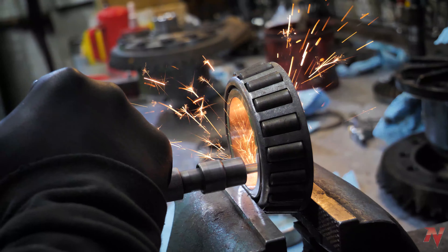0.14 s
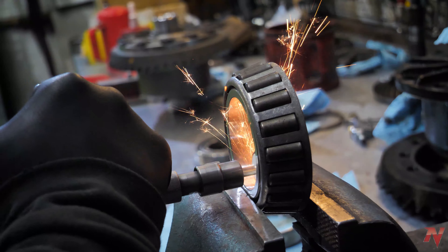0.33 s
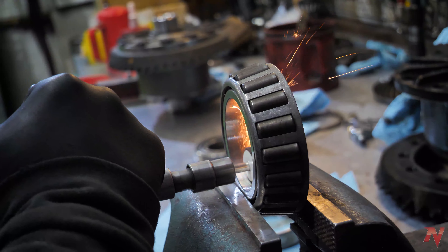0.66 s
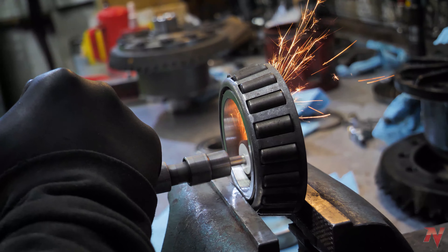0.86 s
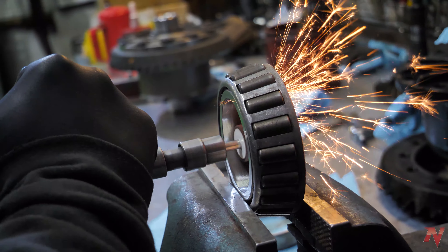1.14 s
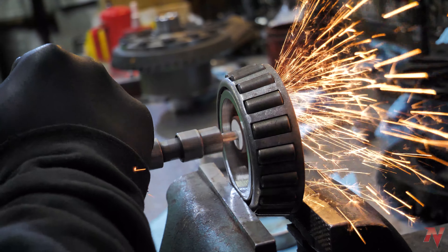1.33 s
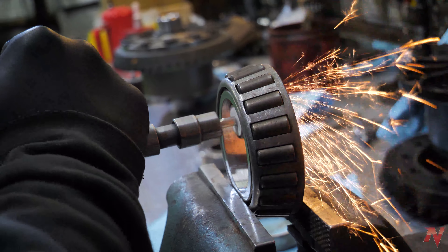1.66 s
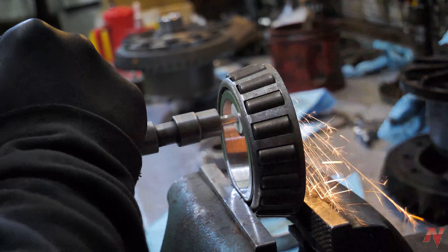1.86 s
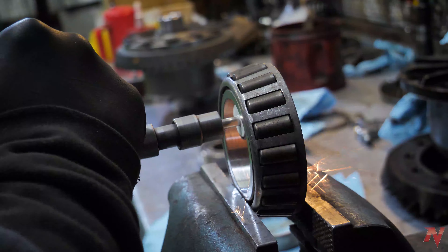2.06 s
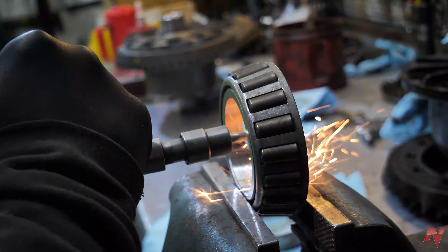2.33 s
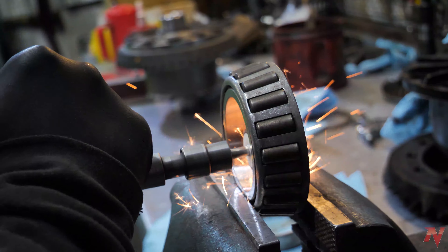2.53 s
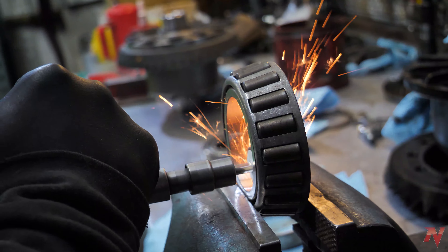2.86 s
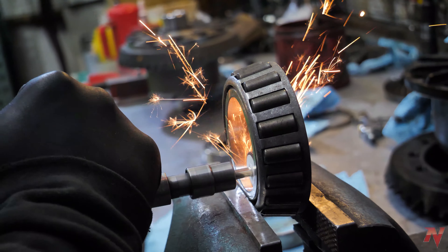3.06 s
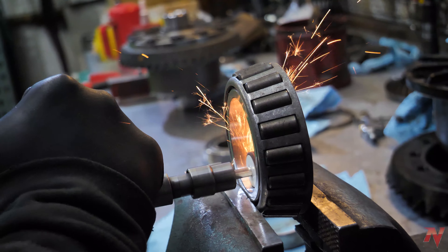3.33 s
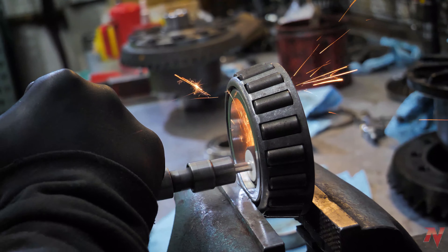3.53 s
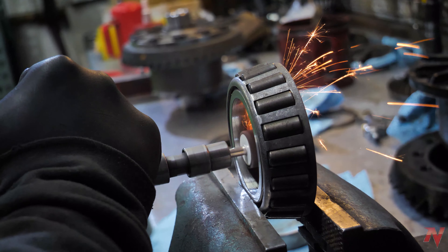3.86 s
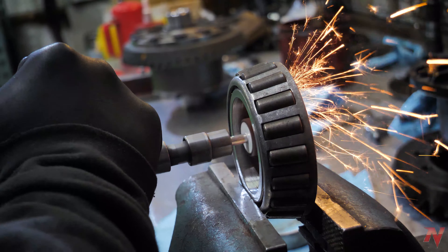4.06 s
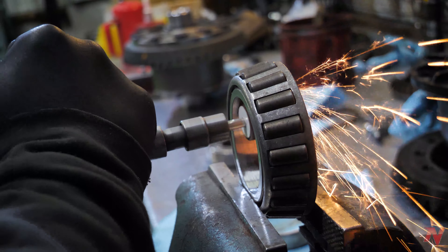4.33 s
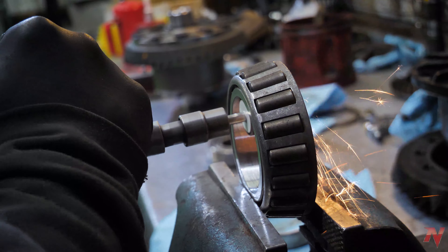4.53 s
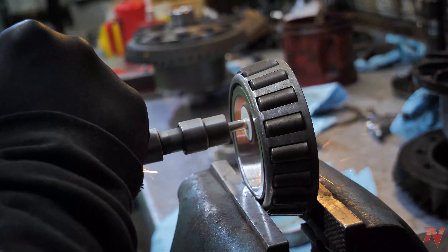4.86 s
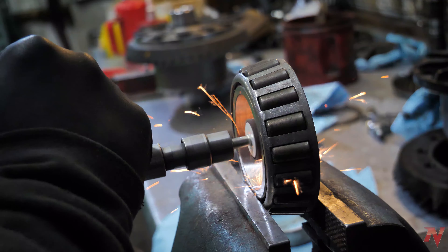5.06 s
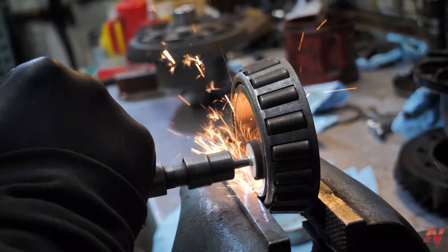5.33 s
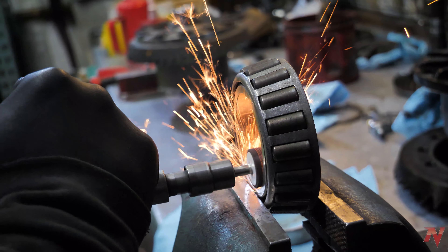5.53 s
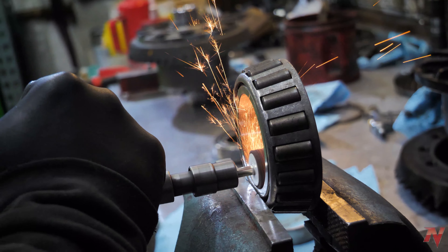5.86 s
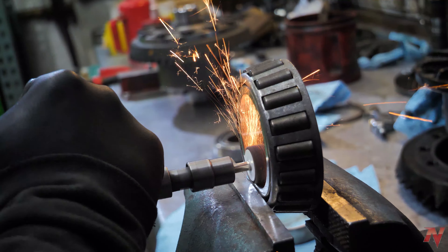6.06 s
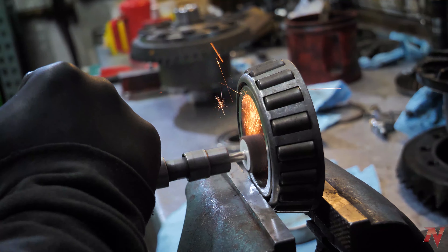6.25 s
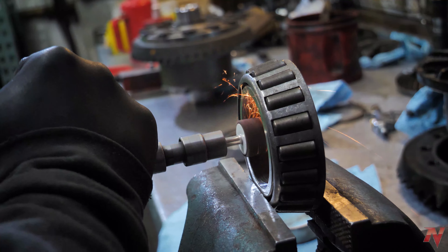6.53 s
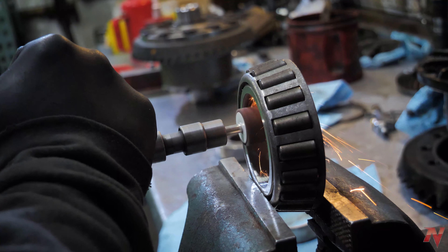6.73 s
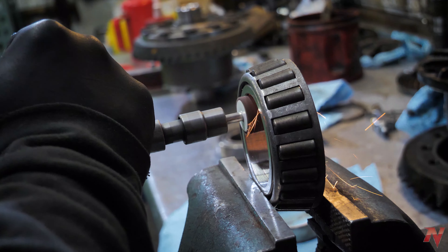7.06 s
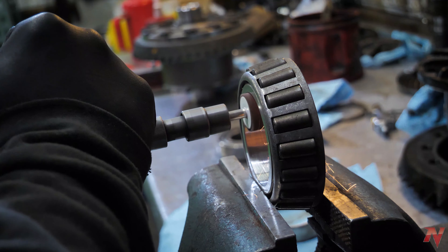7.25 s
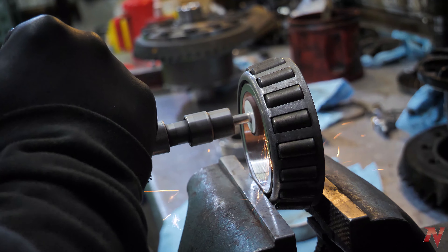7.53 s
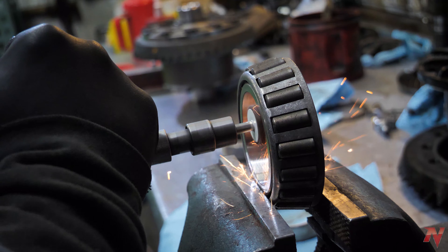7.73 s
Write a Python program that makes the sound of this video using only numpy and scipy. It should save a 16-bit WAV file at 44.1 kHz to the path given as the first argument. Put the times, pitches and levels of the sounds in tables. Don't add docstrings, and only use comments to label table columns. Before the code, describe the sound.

A close, dry, almost mono workshop sound: an air die grinder is already running at full noise and continues through about 8 seconds. A buzzing motor hum near 800-900 Hz carries a dense, shrill whine, with abrasive scraping, spark sizzle and airy exhaust hiss over low rumble and bench shake. From 0 to 0.6 s it bites hard, the pitch sagging deeply around 0.35 s. Near 0.9-1.2 s the scrape eases and bright steel ringing surges. Rougher grinding returns at 1.4-1.8 s, then lighter ringing near 2 s. Heavy, lower-pitched scraping fills 2.5-3.5 s, dipping most around 3 s. A piercing ring rises at 3.8 s, followed by uneven rasping and another ring around 4.6-4.9 s. From 5.2 to 6 s the load and hiss grow; at 6.4 s it brightens sharply, then alternates moderate scraping with ringing until the end, still running.

```python
import sys
import numpy as np
from scipy import signal
from scipy.fft import rfft, irfft, next_fast_len
from scipy.io import wavfile

SR = 44100
rng = np.random.default_rng(int(sys.argv[2]) if len(sys.argv) > 2 else 0)


def magnitude_from_level(level_db):
    exponent = np.asarray(level_db, float) / 20
    return 10 ** exponent


def inscribe(sig):
    pcm = np.round(np.clip(np.atleast_2d(sig).T, -1, 1) * 32767)
    wavfile.write(sys.argv[1], SR, pcm.astype(np.int16))


N = 348390
STEP = 64


def wheel(angle, speed, level, wander, wander_hz, spread):
    # f/Hz, width/Hz, level/dB
    ring_families = [
        [(5890, 505, -8), (6380, 500, -7.5)],
        [(7004, 910, -9), (7930, 860, -7)],
        [(8900, 1230, -9.5), (10110, 1460, -11)],
    ]
    # f/Hz, level/dB
    whine_skirt = [(200, -22), (1200, -17.5), (3000, -6), (9000, -34.5), (11000, 0), (15500, -2.5)]
    strong_orders = {6: 9.6, 15: 6.1, 26: 1.3, 27: 1.5, 28: 2.1, 32: 4.1, 36: 4.3, 38: 1.8, 40: 2.8, 43:
                     3.1, 44: 3.3, 46: 3.6, 48: 2.4, 52: 2.9, 56: 2.2, 60: 5.4, 64: 2.6}
    orders = np.arange(1, 76)
    hz = orders[:, None] * speed

    hump = 0
    for family_db, modes in zip(level["rings"], ring_families):
        for k, (f, width, db) in enumerate(modes):
            hump = hump + magnitude_from_level(family_db + db) * (-1) ** k / (1 + 2j * (hz - f) / width) ** 2
    thud = magnitude_from_level(level["low whine"] - 7.0) * np.exp(-.5 * ((hz - 4500) / 700) ** 2)
    edge = magnitude_from_level(level["whine top"] - 15.0 + at_hz(whine_skirt, hz))
    accent = magnitude_from_level([[strong_orders.get(k, 0)] for k in orders])

    knock = np.exp(1j * spread * rng.standard_normal((len(orders), 1)))
    wear = drift(wander_hz, count=len(orders)) + 1j * drift(wander_hz, count=len(orders))
    contacts = knock + wander * wear[:, :len(speed)]
    share = (hump + 1j * (thud + edge)) * accent * contacts * (hz < 15800)

    turn, spin, out = np.exp(1j * angle), np.ones(N, complex), np.zeros(N)
    for row in share:
        spin *= turn
        out += full(row.real) * spin.real - full(row.imag) * spin.imag
    return out


def motor(angle, speed, level, fourth_db, sides_db, flutter_db):
    # f/Hz, width/Hz, level/dB
    exhaust_pipe = [(812, 76, 8.5), (1590, 57, 11), (1865, 80, 3.5), (2365, 285, 9), (2583, 60, 4)]

    def through_pipe(part, order):
        return full(level[part] + resonance(exhaust_pipe, order * speed))

    shaft_db, puff_db = full(level["shaft"]), full(level["puff"])
    vane_db = through_pipe("vanes", 4) + full(level["push"])
    second_db = through_pipe("second", 8) + .6 * puff_db
    third_db = through_pipe("third", 12) + puff_db
    tones = {1: shaft_db, 2: shaft_db - 2.5, 3: vane_db + sides_db, 4: vane_db, 5: shaft_db,
             8: second_db, 12: third_db, 16: third_db + fourth_db}
    out = np.zeros(N)
    for (k, db), slow in zip(tones.items(), drift(10.3, count=len(tones))):
        unsteady_db = flutter_db * (1 + k / 9) * full(slow)
        out += np.sqrt(2) * magnitude_from_level(db + unsteady_db) * np.sin(k * angle + k)
    return out


def scraping(level, pulse, patchy_db):
    # f/Hz, level/dB per Hz
    scrape_spectrum = [(900, -32.5), (1400, -17.5), (2000, -8), (2400, -6), (3300, 0.5), (4000, -6),
                       (4700, -7.5), (6000, -11), (8000, -60)]
    # f/Hz, width/Hz, level/dB
    ring_modes = [(1565, 43, 14), (2248, 63, 7), (2396, 77, 7), (2560, 42, 6), (3178, 81, 6.5),
                  (3530, 64, 6.5), (3744, 140, 4.5), (4500, 200, -5)]
    grit = noise(scrape_spectrum, (1900, 4500), ring_modes)
    return magnitude_from_level(full(level["scrape"])) * patches(patchy_db) * pulse * grit


def sparking(level, pulse, patchy_db):
    # f/Hz, level/dB per Hz
    spark_spectrum = [(3000, -21), (4500, 9.5), (6000, 1), (8000, 4.5), (9500, -19), (12000, -14),
                      (15000, -25)]
    return magnitude_from_level(full(level["sparks"]) - 2.5) * patches(patchy_db) * pulse * noise(spark_spectrum, (5000, 9500))


def exhaust(level, pulse, patchy_db):
    # f/Hz, level/dB per Hz
    jet_spectrum = [(5000, -12), (9000, -3), (11000, -10), (13000, -1), (15500, -2.5)]
    return magnitude_from_level(full(level["air"]) + 2.0) * patches(patchy_db) * pulse * noise(jet_spectrum, (10500, 15500))


def rumble(level, patchy_db):
    # f/Hz, level/dB per Hz
    rumble_spectrum = [(20, -21), (150, -45), (250, -10.5), (500, -8.5), (800, -2.5), (1200, -3), (1500, 4),
                       (2200, -4.5)]
    return magnitude_from_level(full(level["rumble"]) - 2.5) * patches(patchy_db) * noise(rumble_spectrum, (300, 1500))


def bench(level):
    bass = signal.butter(2, 140, fs=SR, output="sos")
    shake = signal.sosfilt(bass, rng.standard_normal(N))
    return magnitude_from_level(1.3 * (full(level["scrape"]) + 24) - 46) * shake


def shaft_sag():
    # t/s, sag f/Hz, spread t/s
    leans = [(-0.018, 17.1, 0.105), (0.339, 40.2, 0.18), (0.668, 11.1, 0.112), (0.978, 6.1, 0.097),
             (1.347, 20.0, 0.093), (1.502, 14.7, 0.091), (1.69, 17.3, 0.155), (2.013, 16.2, 0.104),
             (2.549, 36.3, 0.142), (2.685, 12.7, 0.085), (3.016, 45.3, 0.172), (3.304, 21.1, 0.1),
             (3.525, 14.0, 0.108), (4.053, 15.8, 0.091), (4.472, 10.0, 0.213), (4.848, 13.8, 0.097),
             (5.296, 10.8, 0.099), (5.375, 22.6, 0.296), (5.88, 19.6, 0.2), (6.08, 6.8, 0.128),
             (6.869, 17.0, 0.17), (7.559, 18.1, 0.416), (7.771, 13.3, 0.095)]
    # t/s, sag f/Hz, spread t/s
    nudges = [(0.137, 1.2, 0.025), (0.936, 1.2, 0.029), (1.122, 3.9, 0.043), (2.189, 14.1, 0.074),
              (2.371, 16.8, 0.06), (2.818, 4.3, 0.039), (3.132, 8.1, 0.066), (3.734, 3.6, 0.06),
              (3.904, 2.5, 0.029), (4.2, 8.0, 0.08), (4.721, 2.7, 0.039), (5.04, 7.4, 0.064),
              (5.468, 2.1, 0.036), (5.829, 1.3, 0.028), (6.168, 3.2, 0.033), (6.283, 3.1, 0.04),
              (6.43, 10.8, 0.055), (6.57, 5.4, 0.079), (6.64, 2.7, 0.028), (7.369, 1.3, 0.027),
              (7.93, 9.9, 0.04)]
    both = leans + nudges
    return swells(both, np.array(both)[:, 1])


def ring_levels():
    # t/s, peak level/dB, spread t/s
    low_swells = [(.55, -36, .1), (.93, -22.5, .17), (1.52, -34, .1), (1.82, -32, .1), (2.2, -35, 0.19),
                  (3.1, -44, 0.16), (3.52, -38, 0.13), (3.77, -23, 0.095), (4.3, -29, 0.11),
                  (4.55, -32, .1), (4.9, -28.5, .14), (5.85, -34, .12), (6.32, -24.5, 0.085),
                  (6.72, -32, 0.11), (7.0, -33.5, .12), (7.6, -35, .13)]
    # t/s, peak level/dB, spread t/s
    middle_swells = [(.95, -22, 0.24), (1.17, -28.5, 0.079), (1.57, -35, 0.089), (2.04, -25, 0.15),
                     (2.92, -43, .07), (3.55, -32, 0.1), (3.86, -21.5, 0.13), (4.2, -28, 0.14),
                     (4.66, -26.5, 0.14), (4.91, -29.5, 0.12), (5.68, -37.5, 0.23), (6.08, -35, .08),
                     (6.37, -27, 0.074), (6.6, -27, 0.19), (7.0, -33, 0.12), (7.25, -25.5, 0.089),
                     (7.5, -25.5, 0.13), (7.9, -34, .08)]
    # t/s, peak level/dB, spread t/s
    high_swells = [(.64, -30, .13), (.82, -34, .06), (1.15, -30.5, 0.18), (1.7, -34, .1), (1.96, -25, .13),
                   (2.75, -41, 0.089), (3.49, -31, 0.079), (3.85, -26.5, 0.18), (4.62, -26, 0.19),
                   (5.5, -38, .15), (5.9, -37, 0.13), (6.15, -34, .1), (6.42, -26.5, 0.15),
                   (7.0, -35.5, 0.11), (7.27, -27, 0.15), (7.53, -32, .06)]
    ring_rest = [-33.5, -34, -37.5]
    families = (low_swells, middle_swells, high_swells)
    return np.array([swelling(rows, rest_db) for rows, rest_db in zip(families, ring_rest)])


def handling():
    # t/s, scrape level/dB
    bite = [(0, -22), (.54, -21.5), (1.07, -32), (1.45, -25.5), (1.76, -23.5), (2.1, -30), (2.45, -26.5),
            (2.9, -23), (3.38, -21.5), (3.92, -30.5), (4.5, -24.5), (4.85, -30), (5.45, -25.5), (5.88, -23),
            (6.33, -26), (6.43, -32.5), (6.75, -27), (7.9, -28)]
    # t/s, laps
    laps = [(0, 0.5), (.6, -0.65), (3.3, 0.97), (6.0, 2), (7.9, 3)]
    follows = {"vanes": (-42, .3, -0.15, -0.0574, 0), "second": (-45.5, 0.2, 0.25, -0.1, 3.3),
               "third": (-42, 0.35, 0.02, -0.08, 0.5), "sparks": (-30, 1.03, 0.03, .05, -0.9),
               "rumble": (-39, 0.53, -0.16, -0.0961, -0.8)}
    # t/s, level/dB
    blow = [(0, -37), (.67, -38.5), (1.05, -48), (1.5, -37.5), (1.85, -37), (2.08, -43), (2.75, -36),
            (3.35, -36), (4.05, -46), (4.55, -38), (4.82, -43), (5.2, -37), (5.7, -32), (6.1, -35.5),
            (6.45, -45), (7.1, -36), (7.45, -44), (7.9, -34.5)]
    # t/s, level/dB
    vane_push = [(0, 0.5), (.15, 2), (.55, 2), (.8, -2.5), (1.3, -3), (1.94, 0.5), (2.2, -1.5), (2.35, 0.5),
                 (2.6, -2), (2.85, 2.5), (3.0, -2.5), (3.4, 1.5), (4.0, -1), (5.4, 2), (6.35, 1),
                 (6.52, -5), (7.1, 1.7), (7.9, -0.5)]
    # t/s, overtone level/dB
    puff_edge = [(0, -13), (.3, 4.5), (.55, 0.5), (1.1, -2), (1.45, 0), (2.1, -2.5), (2.45, 2.5),
                 (3.5, 4.5), (3.85, -5), (4.12, 4.5), (4.5, 2), (4.9, 2.5), (5.4, 3), (5.7, -1), (6.0, 5),
                 (6.5, 0), (6.95, 4), (7.9, -6)]
    # t/s, peak level/dB, spread t/s
    wobbles = [(.28, -52.5, 0.13), (1.15, -63, 0.083), (1.45, -61.5, .15), (2.5, -64, .15),
               (3.1, -55, 0.31), (4.0, -63, 0.14), (4.63, -59, 0.11), (5.3, -63, .2), (6.5, -61.5, .12)]
    # t/s, peak level/dB, spread t/s
    thud_swells = [(0.0, -28.5, 0.21), (.33, -35, 0.086), (.79, -31.5, 0.2), (1.88, -29, 0.18),
                   (3.03, -33, 0.18), (3.64, -29.5, 0.15), (4.59, -30, 0.16), (5.71, -37, 0.44),
                   (6.1, -33.5, 0.17), (7.24, -38, .17)]
    # t/s, peak level/dB, spread t/s
    edge_swells = [(.1, -41.5, 0.11), (.7, -34, .2), (.92, -35, .09), (1.15, -31, .09), (1.7, -37, .1),
                   (1.92, -33, .1), (2.82, -36, .07), (3.35, -38, .12), (3.79, -28, .2), (4.7, -38, 0.24),
                   (5.4, -39, 0.22), (5.92, -34, .25), (6.42, -31, 0.11), (7.25, -35, .1), (7.5, -37, .08)]
    free_speed_hz = 234
    usual_db, usual_sag_hz = -25, 22

    sag, rings, bite_db = shaft_sag(), ring_levels(), in_time(bite)
    ringing_db = 10 * np.log10(np.sum(magnitude_from_level(2 * rings), axis=0))
    near = np.cos(2 * np.pi * in_time(laps))
    level = {"scrape": bite_db, "air": in_time(blow), "rings": rings,
             "push": in_time(vane_push), "puff": in_time(puff_edge), "shaft": swelling(wobbles, -71),
             "low whine": swelling(thud_swells, -38), "whine top": swelling(edge_swells, -34.5)}
    for part, (db, by_bite, by_ringing, by_sag, by_place) in follows.items():
        load_db = by_bite * (bite_db - usual_db) + by_ringing * (ringing_db - usual_db)
        level[part] = db + load_db + by_sag * (sag - usual_sag_hz) + by_place * near
    return free_speed_hz - sag, level


def in_time(rows):
    s, value = np.transpose(rows)
    return np.interp(np.arange(0, N + STEP - 1, STEP) / SR, s, value)


def full(slow):
    return np.interp(np.arange(N) / STEP, np.arange(len(slow)), slow)


def swells(rows, heights):
    s, _, spread = np.transpose(rows)
    t = np.arange(0, N + STEP - 1, STEP)[:, None] / SR
    return np.sum(heights * np.exp(-.5 * ((t - s) / spread) ** 2), axis=1)


def swelling(rows, rest_db):
    return 20 * np.log10(magnitude_from_level(rest_db) + swells(rows, magnitude_from_level(np.array(rows)[:, 1])))


def drift(rate_hz, count):
    r = np.exp(-2 * np.pi * rate_hz * STEP / SR)
    chance = rng.standard_normal((count, N // STEP + 1002))
    slow = signal.lfilter([1], [1, -2 * r, r * r], chance)[:, 1000:]
    return slow / slow.std(axis=1, keepdims=True)


def patches(patchy_db):
    return magnitude_from_level(patchy_db * full(drift(9.4, count=1)[0]))


def at_hz(points, hz):
    f, db = np.transpose(points)
    return np.interp(np.log(hz), np.log(f), db)


def resonance(modes, hz):
    return sum(db / (1 + (2 * (hz - f) / width) ** 2) for f, width, db in modes)


def noise(spectrum, band, modes=()):
    size = next_fast_len(N)
    hz = np.arange(1, size // 2 + 2) * SR / size
    gain = magnitude_from_level(at_hz(spectrum, hz) + resonance(modes, hz)) * (hz < 16000)
    inside = gain[(hz > band[0]) & (hz < band[1])]
    rms = np.sqrt(2 * np.sum(inside ** 2) / size)
    return irfft(rfft(rng.standard_normal(size)) * gain, size)[:N] / rms


def scene():
    speed, level = handling()
    angle = 2 * np.pi * np.cumsum(full(speed)) / SR
    pulse = 1 + 0.068 * (np.cos(angle) + np.cos(2 * angle + 0.5) + np.cos(4 * angle + 4.2))
    patchy_db = 0.39
    tool = wheel(angle, speed, level, wander=0.41, wander_hz=3.8, spread=1.61)
    tool += motor(angle, speed, level, fourth_db=-8.5, sides_db=-22.5, flutter_db=0.76)
    tool += scraping(level, pulse, patchy_db)
    tool += sparking(level, pulse, patchy_db)
    tool += exhaust(level, pulse, patchy_db)
    tool += rumble(level, patchy_db)
    tool += bench(level)
    return np.array([tool, tool])


def top_cut(x):
    return signal.sosfilt(signal.butter(12, 15710, fs=SR, output="sos"), x)


def record(dry):
    # t/s, low f/Hz, high f/Hz
    wide_moments = [(.17, 11800, 14000), (1.333, 11000, 14000), (2.352, 6300, 12000), (2.375, 13800, 15400),
                    (3.072, 4200, 5900), (3.072, 11800, 13300), (3.21, 8300, 12000), (3.377, 6300, 12600),
                    (3.607, 13800, 15400), (3.816, 14500, 15700), (5.395, 9700, 11200),
                    (5.395, 13800, 15700), (5.462, 5100, 6400), (5.65, 4200, 5400), (5.857, 14500, 15700),
                    (7.67, 4600, 5900), (7.67, 7600, 9900)]
    mono = dry[0] / (1 + (dry[0] / .57) ** 8) ** (1 / 8)
    side = np.zeros(N)
    window = np.hanning(1536)
    hz = np.arange(769) * SR / 1536
    for s, low, high in wide_moments:
        start = round(s * SR) - 768
        span = slice(start, start + 1536)
        band = (hz > low) & (hz < high)
        band_rms = irfft(rfft(mono[span]) * band).std()
        fill = irfft(rfft(rng.standard_normal(1536)) * band)
        side[span] += 0.98 * band_rms * fill / fill.std() * window
    return top_cut(np.array([mono + side, mono - side]))


dry = scene()
out = record(dry)
inscribe(out)
```